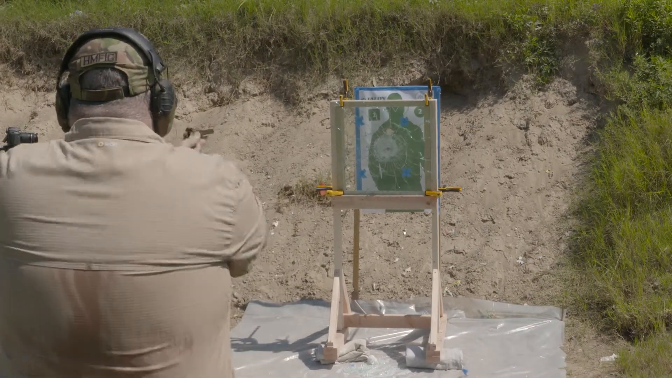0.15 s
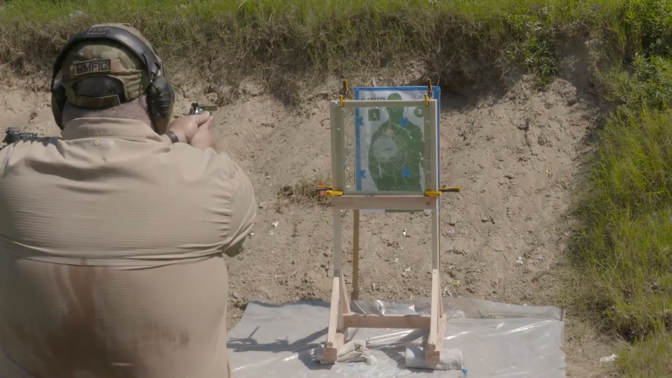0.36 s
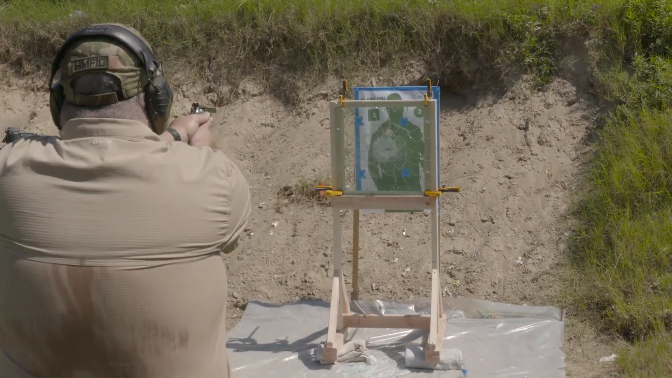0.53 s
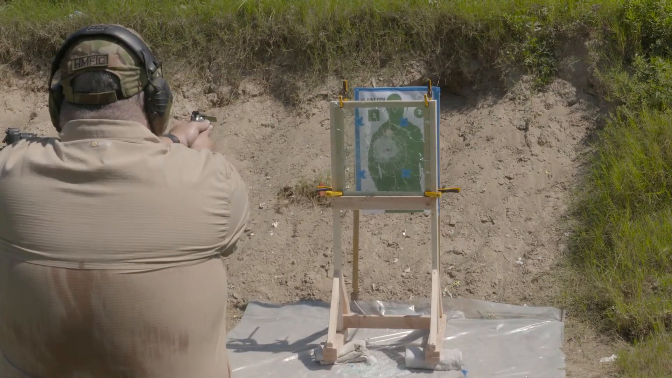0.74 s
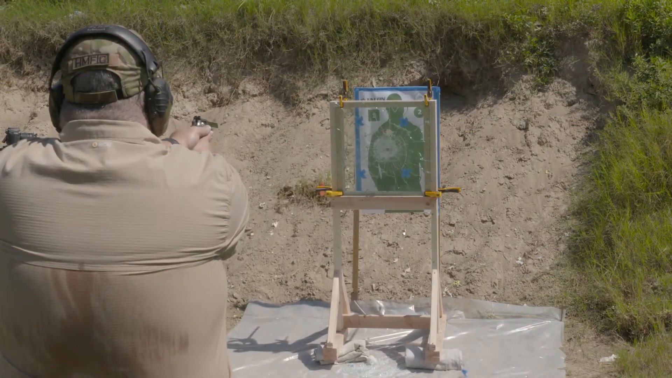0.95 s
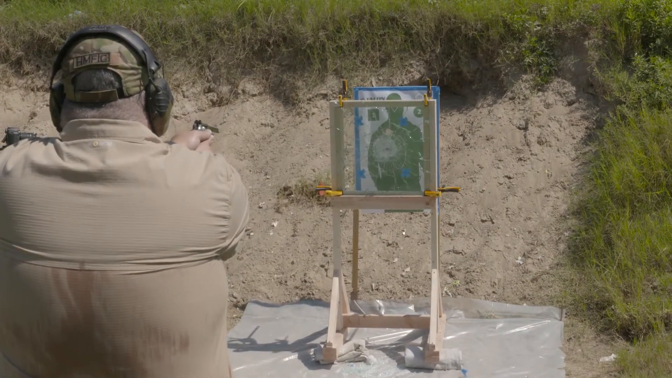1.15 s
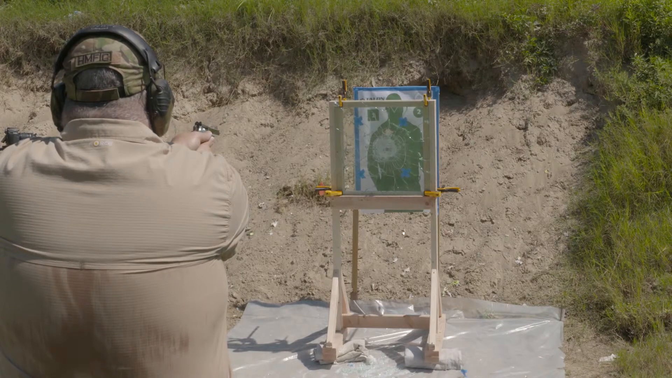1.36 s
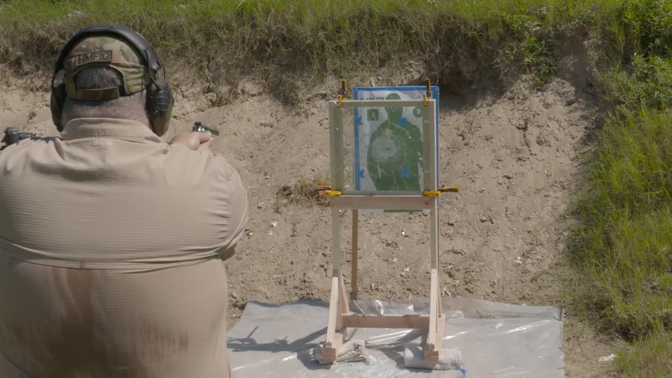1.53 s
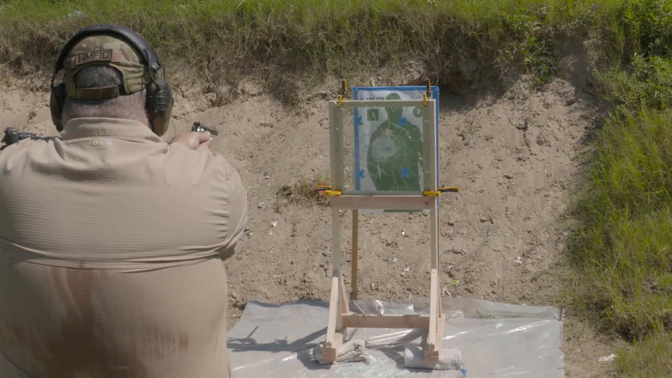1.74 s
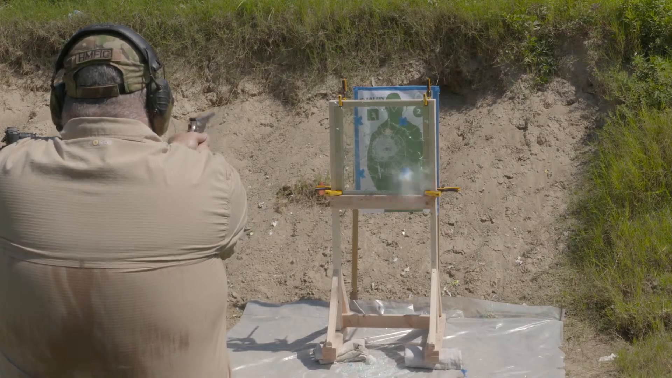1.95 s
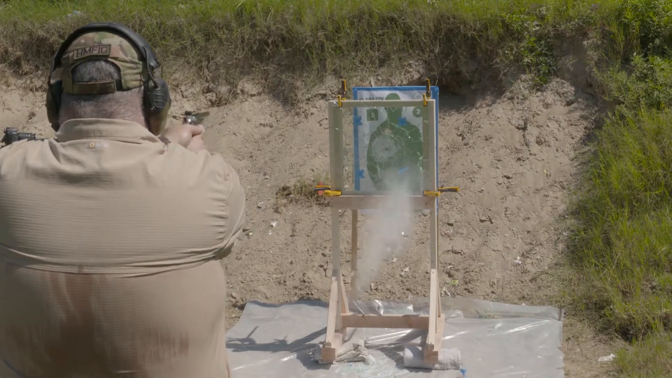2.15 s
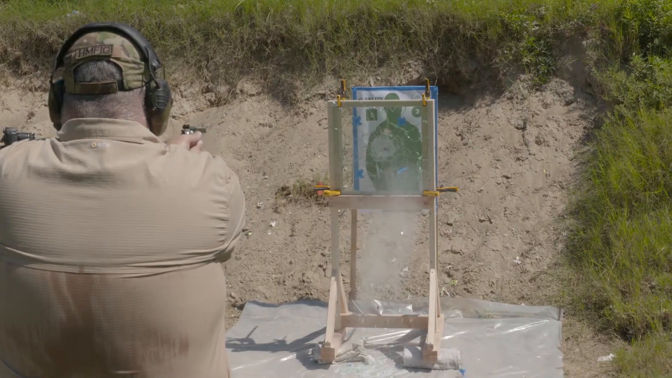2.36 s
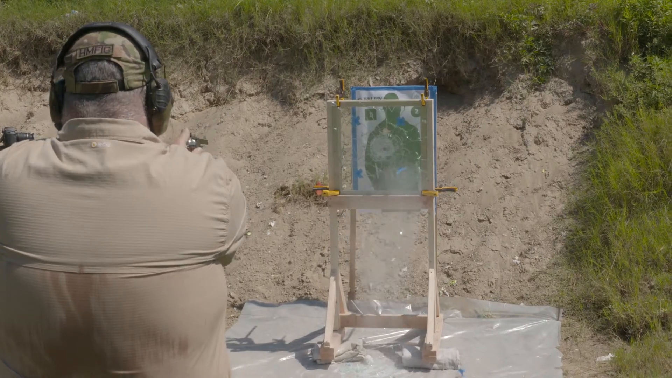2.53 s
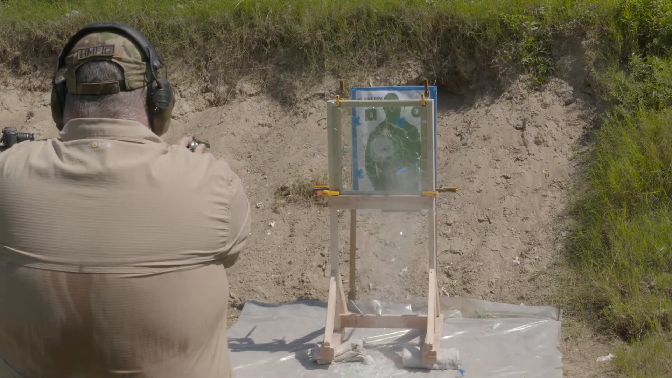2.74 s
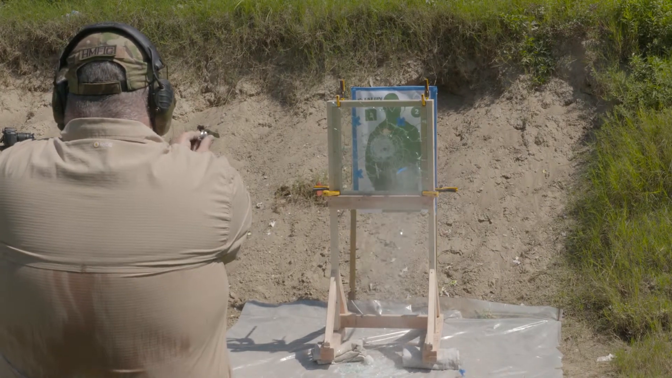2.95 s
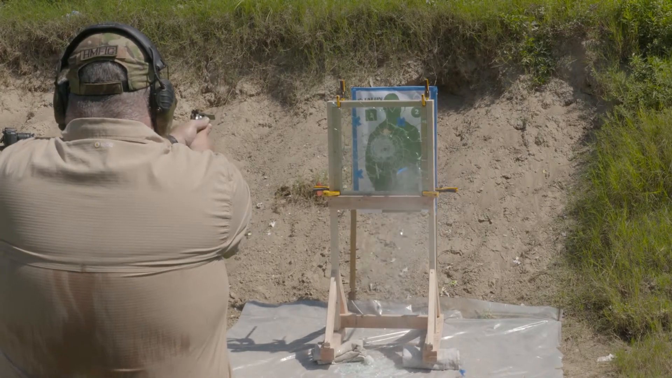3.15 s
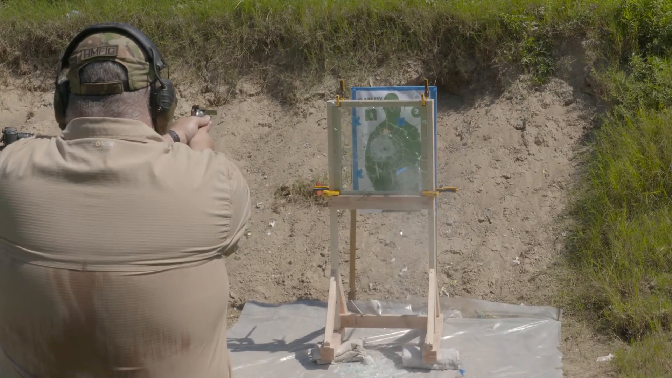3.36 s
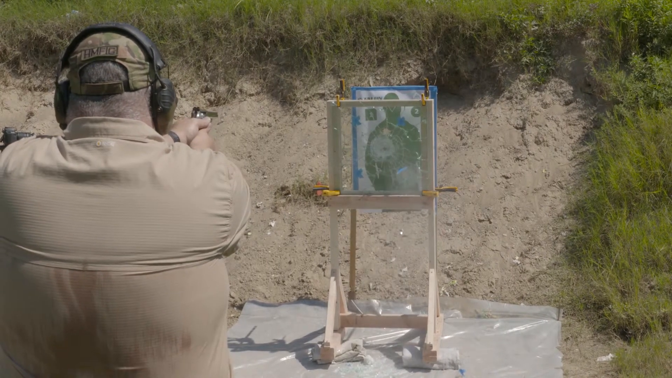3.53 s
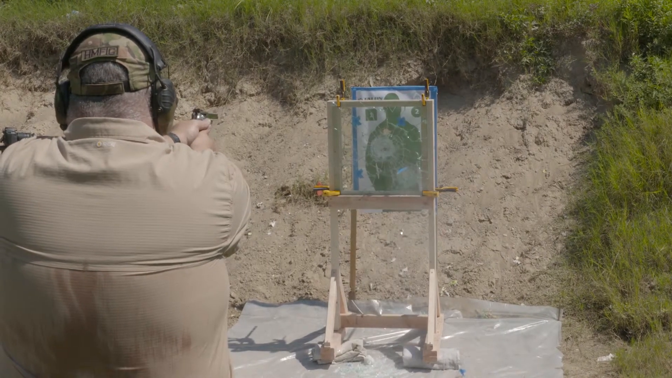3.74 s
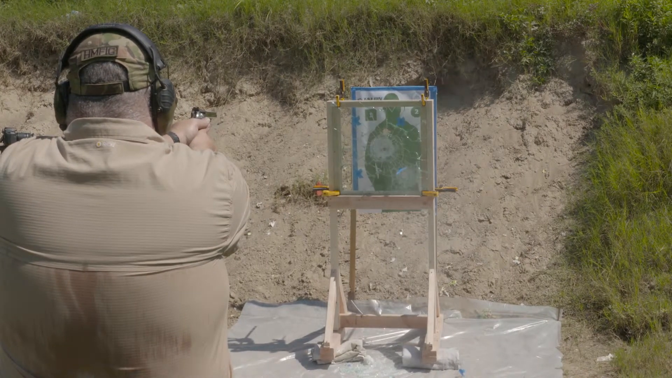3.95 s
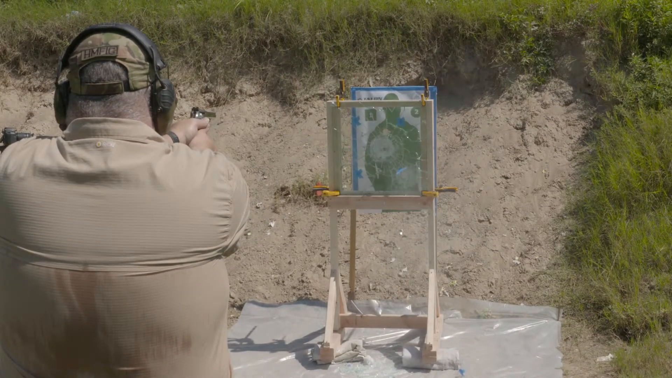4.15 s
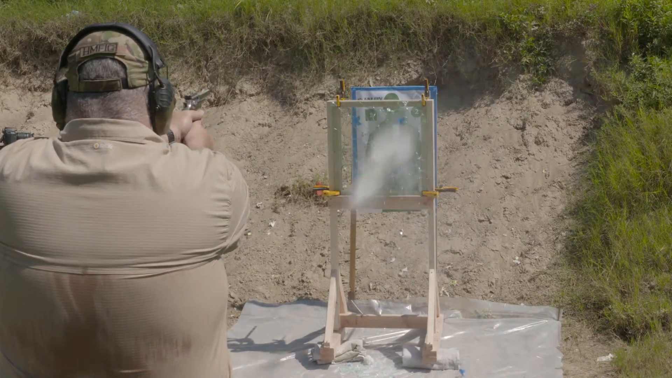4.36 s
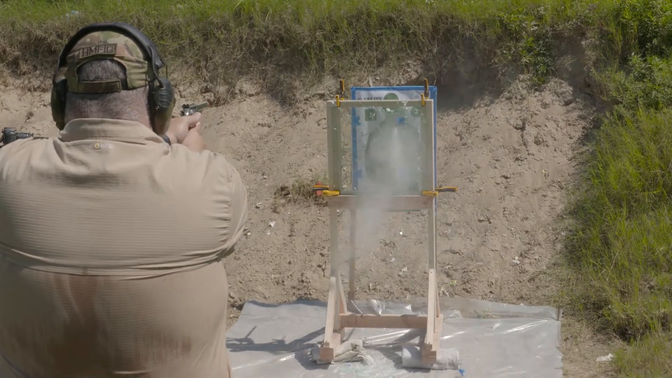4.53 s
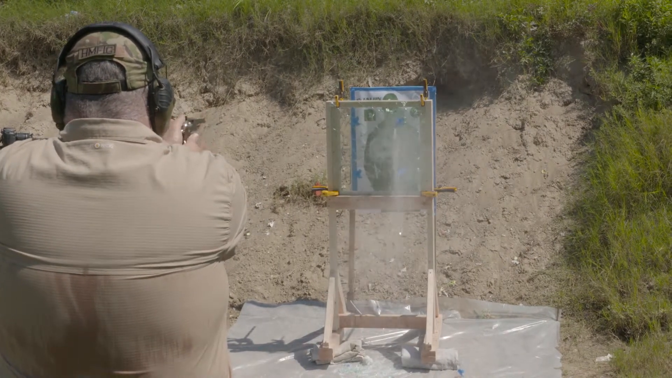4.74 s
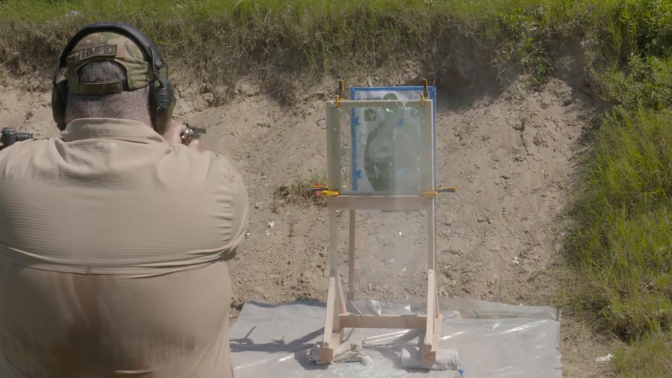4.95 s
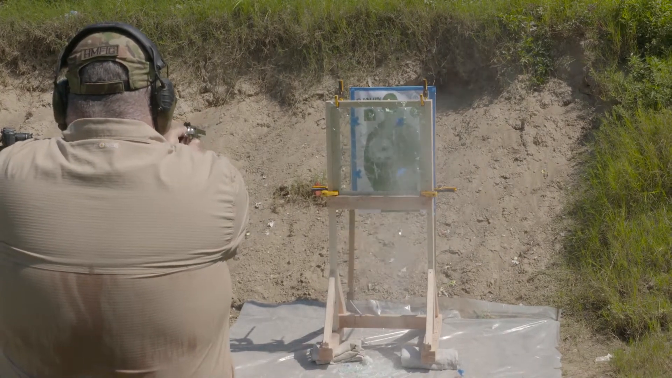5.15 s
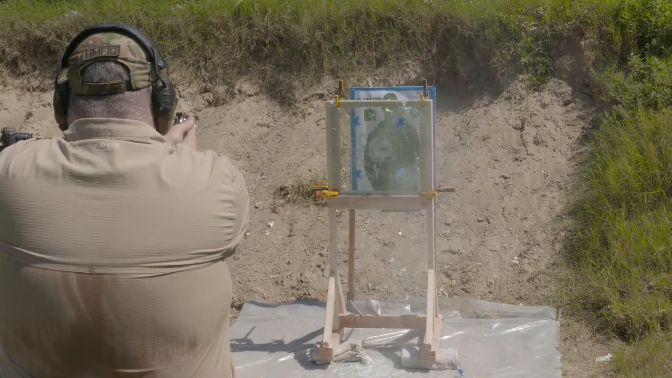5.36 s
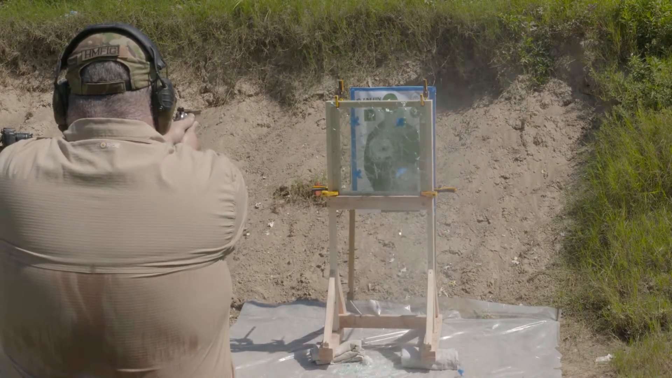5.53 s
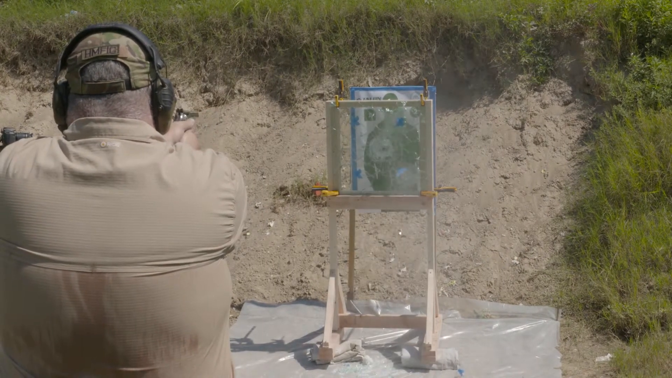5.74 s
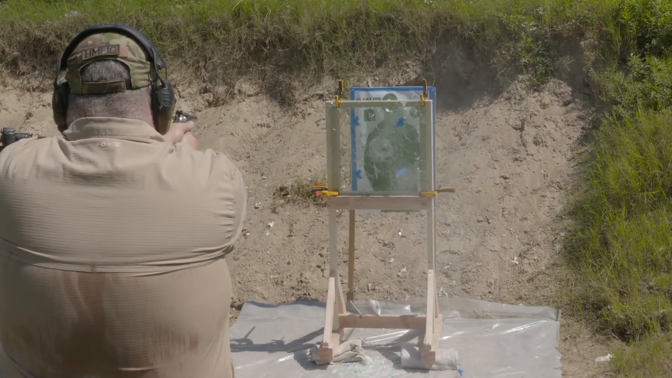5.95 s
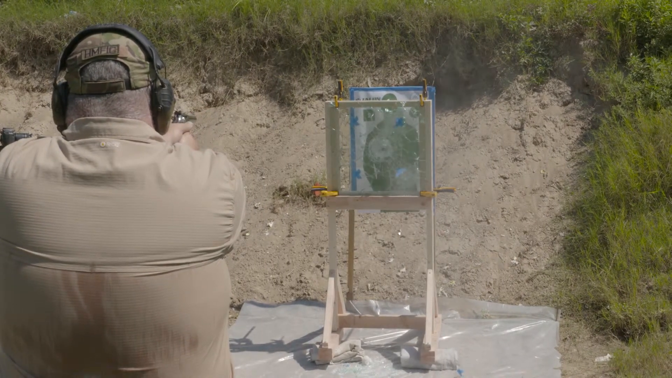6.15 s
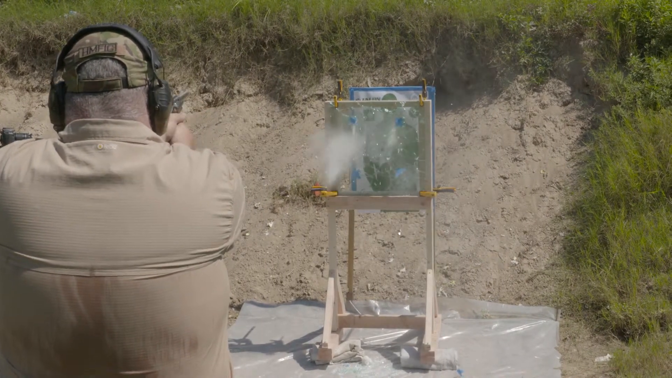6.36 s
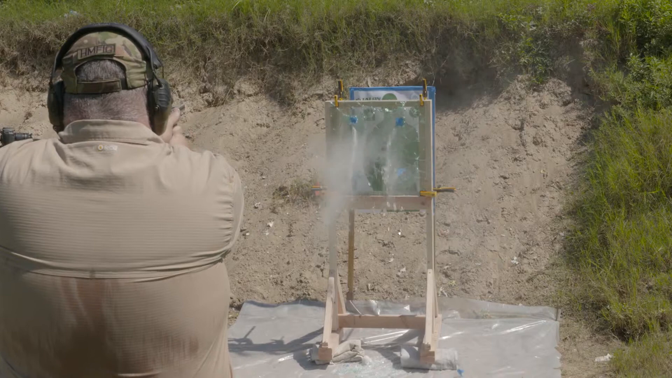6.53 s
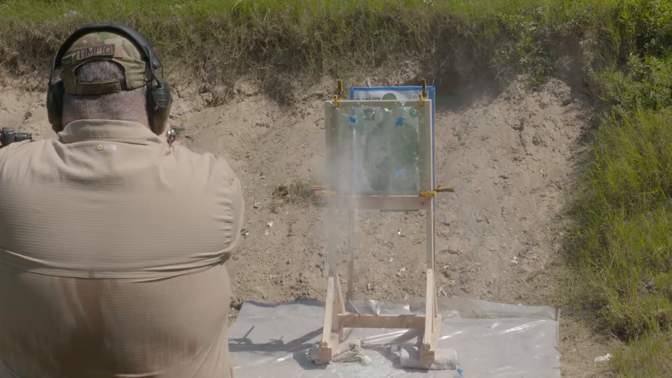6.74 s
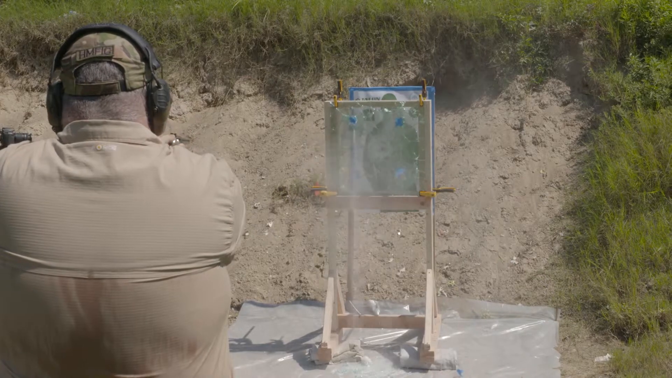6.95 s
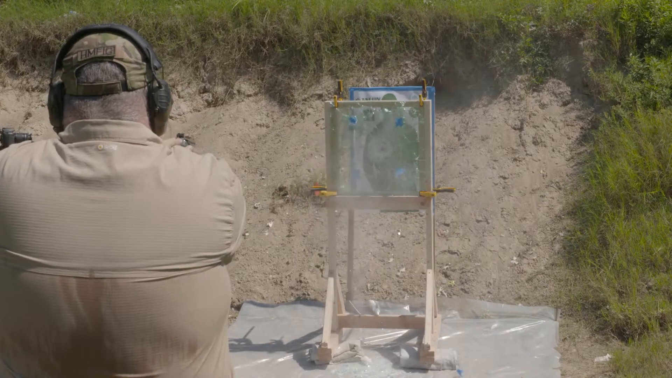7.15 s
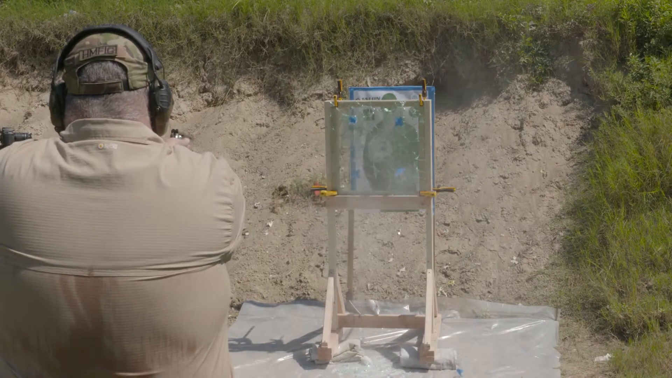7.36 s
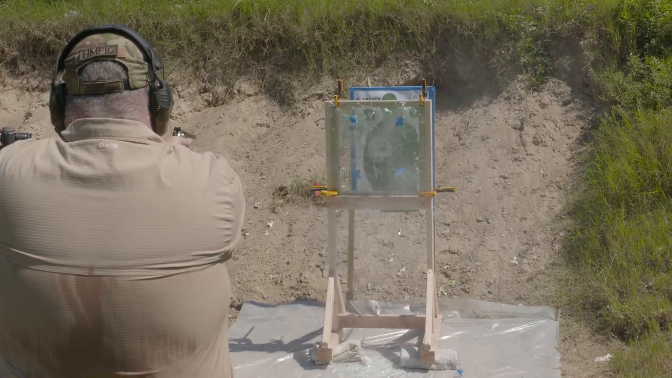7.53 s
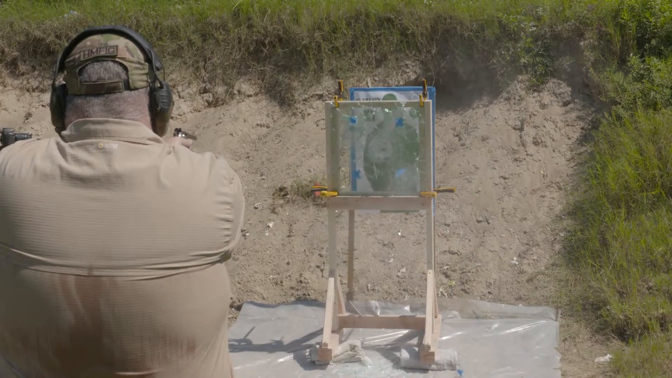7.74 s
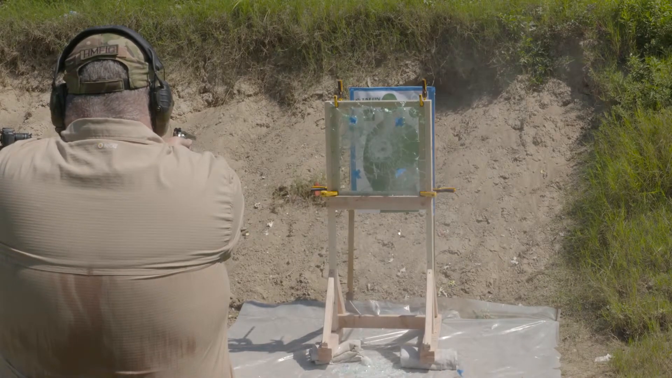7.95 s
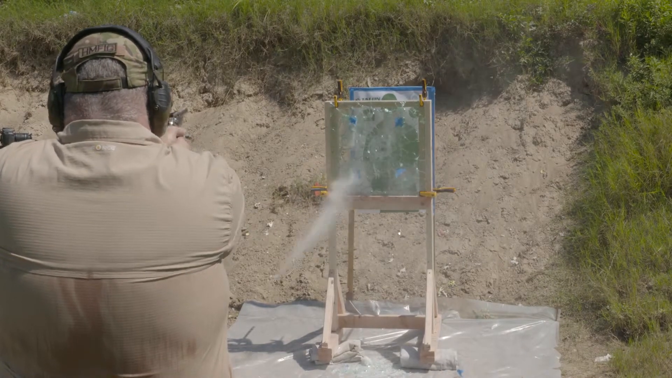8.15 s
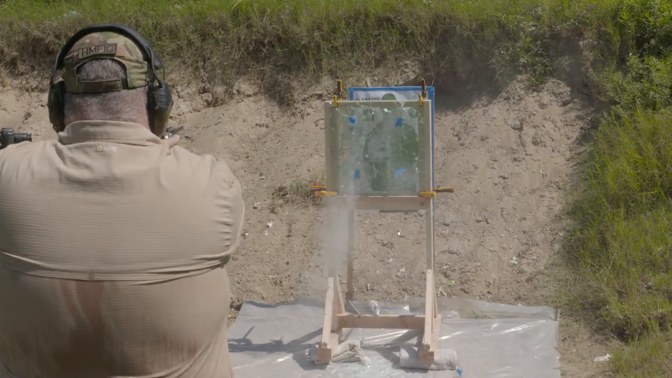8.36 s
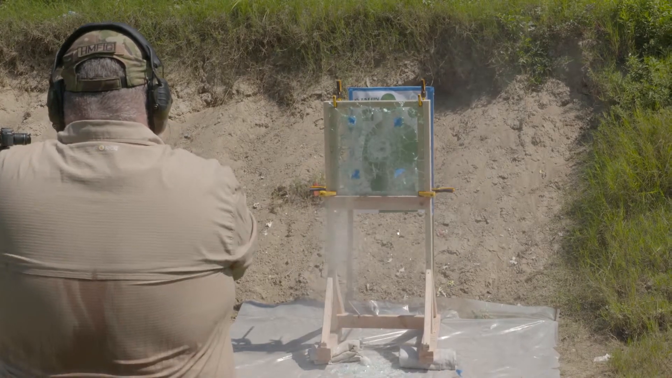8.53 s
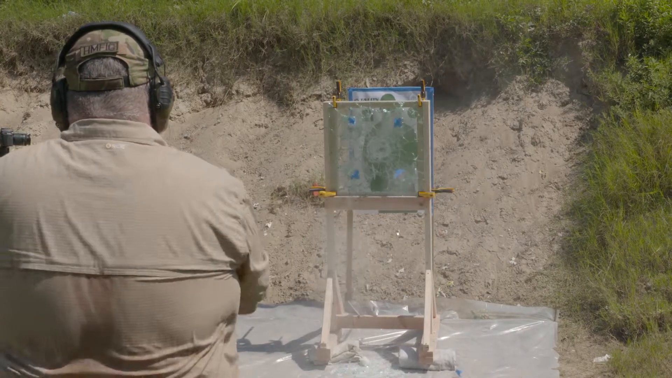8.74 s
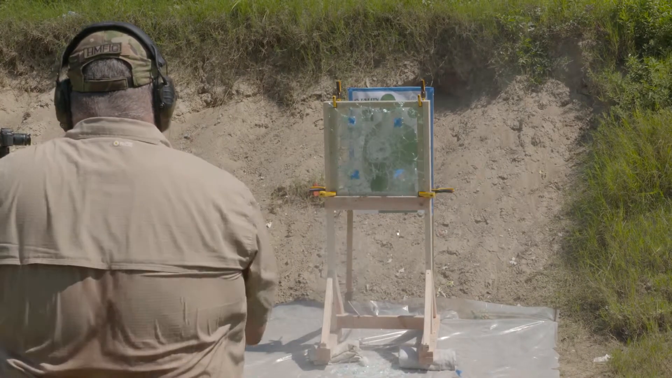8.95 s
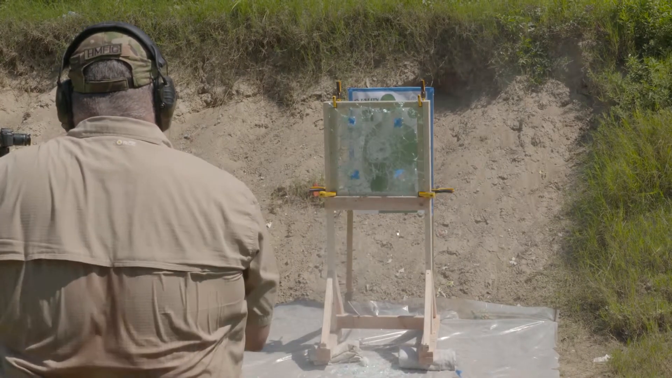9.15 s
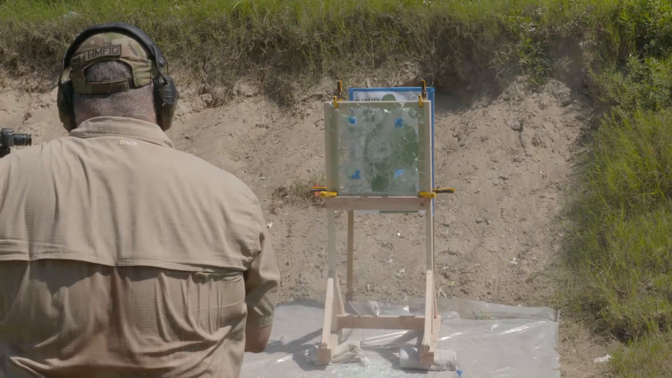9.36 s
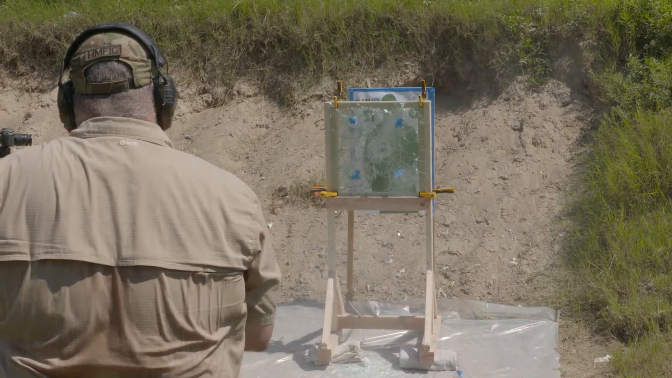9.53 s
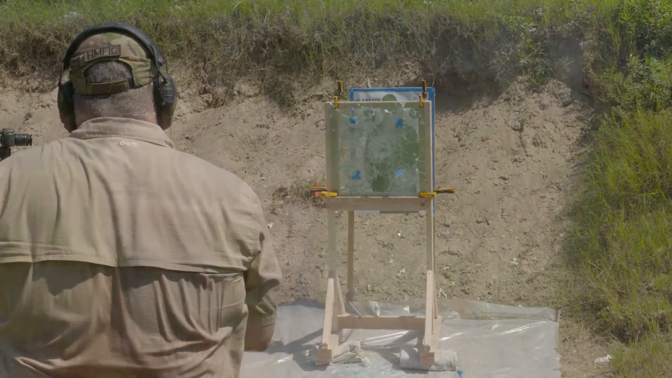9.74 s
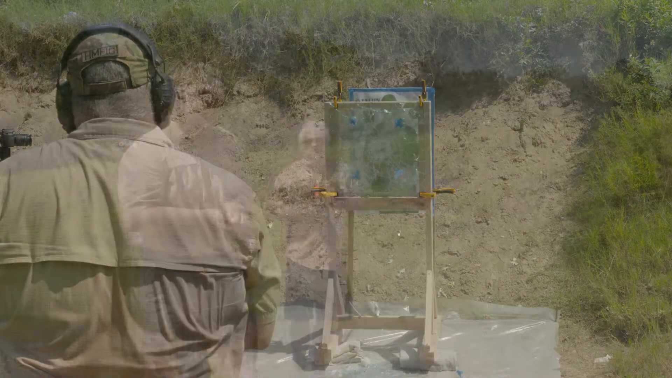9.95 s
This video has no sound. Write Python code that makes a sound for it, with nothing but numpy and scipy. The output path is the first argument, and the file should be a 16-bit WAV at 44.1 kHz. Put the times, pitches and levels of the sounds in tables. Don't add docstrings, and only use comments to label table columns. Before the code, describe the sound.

In a quiet meadow with low wind rumble, chirping cricket, insect hiss and faint far traffic, a handgun right by the microphone fires four separate shots about two seconds apart. Each distorts hard, bounces off an earth bank, flutters downward in pitch and rolls away, while glass shards tick and patter down. The background is ducked after the first shot. Mono.

```python
import sys
import numpy as np
from scipy import signal
from scipy.fft import rfft, irfft, next_fast_len
from scipy.io import wavfile
from scipy.ndimage import uniform_filter1d, map_coordinates

SR = 44100
rng = np.random.default_rng(int(sys.argv[2]) if len(sys.argv) > 2 else 0)


def put_to_file(sound):
    columns = np.atleast_2d(sound).T
    safe = np.clip(columns, -1, 1)
    whole_steps = np.round(safe * 32767)
    wavfile.write(sys.argv[1], SR, whole_steps.astype(np.int16))


def gain_from_decibels(decibels):
    exponent = np.asarray(decibels, float) / 20
    return 10 ** exponent


N = 441000
TIME = np.arange(N) / SR
SHOT_TIME = np.arange(SR // 2) / SR


def noise(t):
    return rng.standard_normal(len(t))


def unit(x):
    return x / np.sqrt(np.mean(x ** 2) + 1e-20)


def at_peak(x, db):
    return gain_from_decibels(db) * x / np.abs(x).max()


def mix_db(*levels_db):
    return 10 * np.log10(sum(gain_from_decibels(db) ** 2 for db in levels_db))


def curves(rows, t=TIME):
    s, *cols = np.transpose(rows)
    return [np.interp(t, s, c) for c in cols]


def wobble(rate):
    return map_coordinates(rng.standard_normal(int(N * rate / SR) + 4), [TIME * rate])


def tone(hz):
    return np.sin(2 * np.pi * np.cumsum(hz) / SR)


def colour(x, spectrum):
    m = next_fast_len(len(x) + 8192)
    f, db = np.transpose(spectrum)
    bins = np.log(np.fft.rfftfreq(m, 1 / SR) + 1)
    gain = gain_from_decibels(np.interp(bins, np.log(f + 1), db, left=-120, right=-120))
    return unit(irfft(rfft(x, m) * gain, m)[:len(x)])


def rush(spectrum, patchy_db):
    z = signal.stft(noise(TIME), nperseg=512)[2]
    field = uniform_filter1d(rng.standard_normal(z.shape), size=6, axis=0)
    field = uniform_filter1d(field, size=10, axis=1)
    patchy = signal.istft(z * gain_from_decibels(patchy_db * unit(field)), nperseg=512)[1][:N]
    return colour(patchy, spectrum)


def grains(rate, centre_hz, cycles):
    draw, k = rng.random((int(rate * N / SR), 2)), np.arange(64)
    hz = centre_hz * np.exp(0.55 * rng.standard_normal(len(draw)))
    hz = np.clip(hz, 800, 15000)[:, None]
    wave = np.sin(2 * np.pi * hz * k / SR) * np.exp(-k * hz / SR / cycles) * gain_from_decibels(-18 * draw[:, 1:])
    at = (draw[:, :1] * (N - 64)).astype(int) + k
    return unit(np.bincount(at.ravel(), wave.ravel(), N))


def add(track, s, x):
    part = track[round(s * SR):][:len(x)]
    part += x[:len(part)]


# time in seconds, level in dB.
WIND = [(0, -42.5), (.4, -45.5), (.7, -46), (1.1, -48.5), (1.6, -43), (2.2, -44.5), (2.7, -45.5),
        (3.15, -45), (3.27, -37), (3.42, -43), (3.54, -37), (3.7, -42), (4, -42.5), (5, -46), (5.7, -42),
        (6.7, -42.5), (7.15, -41), (7.6, -43), (8.5, -42), (9.3, -38), (9.75, -41), (10, -31)]
# frequency in Hz, level in dB per Hz.
RUMBLE = [(8.8, -29.5), (15, 5), (49, 6), (103, -7), (140, -13), (200, -15), (260, -39), (440, -120)]


def wind(gain_db):
    level_db = gain_db + curves(WIND)[0] + 1.5 * wobble(11.0)
    return gain_from_decibels(level_db) * rush(RUMBLE, patchy_db=1.5)


# frequency in Hz, level in dB per Hz.
ROAD = [(41, -23), (70, 1), (135, -6.5), (199, -1.5), (358, -4.5), (489, -4.5), (877, -10.5), (2000, -35),
        (2500, -34), (3250, -57), (5500, -120)]


def road(gain_db):
    roll_db = [np.where(TIME > s, -58 - 10 * (TIME - s), -120) for s, *_ in SHOTS]
    car_db = 4 * np.clip((TIME - 9.78) / 0.063, 0, 1)
    level_db = mix_db(gain_db - 47 + car_db, *roll_db) + 4.5 + 0.8 * wobble(6.0)
    return gain_from_decibels(level_db) * rush(ROAD, patchy_db=0.3)


# note in Hz, steady level in dB, then its swells as it passes, each
# the closest moment in seconds, rise in dB, width in seconds.
DRONE = [
    (90, -66, [(4, 5.5, 0.37), (5.9, 13, 0.53), (7, 8.5, 0.41), (9.3, 7.5, 0.56)]),
    (150.6, -69.5, [(3.1, 1.5, 0.36), (5.45, 14.5, 0.86)]),
    (254, -73.5, [(5.75, 11.5, 0.78)]),
    (173, -80, [(7.7, 14, 0.41)]),
]


def engine():
    out = np.zeros(N)
    for hz, steady_db, swells in DRONE:
        pass_db = sum(rise_db * np.exp(-((TIME - s) / width) ** 2) for s, rise_db, width in swells)
        level_db = steady_db + pass_db + 3 + 1.5 * wobble(4.2)
        out += gain_from_decibels(level_db) * tone(hz * (1 + 0.0065 * wobble(4.5)))
    return out


# frequency in Hz, level in dB per Hz.
FIELD = [(710, -27), (1200, -1), (2010, -10), (3080, -7.5), (3500, -10), (4180, -5), (4550, -6),
         (6530, -3.5), (8560, -21), (9000, -19.5), (11700, -48), (19800, -120)]
# frequency in Hz, level in dB per Hz.
AIR = [(7000, -11.5), (9000, 1), (12000, -4.5), (16000, -5.5)]


def meadow():
    return gain_from_decibels(-52) * rush(FIELD, patchy_db=1.0) + gain_from_decibels(-72) * rush(AIR, patchy_db=.3)


CHIRPS = [.098, .515, .873, 1.185, 1.525, 1.865, 2.8, 3.164, 3.514, 3.845, 5.42, 5.783, 6.11, 7.261, 7.722,
          9.24, 9.5, 9.655]
# frequency in Hz, level in dB per Hz.
KATYDID = [(8900, -30.5), (9400, -5.5), (10000, -3.5), (10400, -8), (10700, -32.5)]
# frequency in Hz, level in dB per Hz.
BUZZER = [(9700, -26.5), (10200, -8.5), (10600, 0.5), (10850, -31)]
# frequency in Hz, level in dB per Hz.
SHRILL = [(9300, -22), (9850, 1), (10150, 0), (10600, -23)]


def insects():
    out, t = np.zeros(N), np.arange(round(.024 * SR)) / SR
    note = np.hanning(len(t)) * np.sin(2 * np.pi * (4360 * t - 4500 * t ** 2))
    for s in CHIRPS:
        for k, db in enumerate(rng.normal(0, 1.6, size=3)):
            add(out, s + .05 * k, gain_from_decibels(db - 51.5 - 3 * (s > 1.82)) * note)
    later = TIME > 1.82
    buzz = 1 + .55 * np.sin(2 * np.pi * 70 * TIME)
    katydid_db = 3.5 * np.cos(2 * np.pi * 4.9 * (TIME - .3) + .4 * wobble(1.5)) - 66.5 - 4 * later
    out += gain_from_decibels(-67.5 + 2.7 * later) * rush(SHRILL, patchy_db=2.5)
    out += gain_from_decibels(katydid_db) * rush(KATYDID, patchy_db=0.47)
    return out + gain_from_decibels(-67.5 - 7.4 * later) * buzz * rush(BUZZER, patchy_db=2.5)


# time in seconds, gain in dB.
GAIN = [
    (0, 1),
    (1.818, 1),
    (1.826, -13.5),
    (9.78, -16.5),
    (10, -7.5),
]


def background():
    gain_db = curves(GAIN)[0]
    return wind(gain_db) + road(gain_db) + gain_from_decibels(gain_db) * (meadow() + insects()) + engine()


# start in seconds, peak in dB, centre in Hz, treble over the peak in dB.
SHARDS = [(0.0278, -34, 6297, -19), (2.348, -41, 2800, -23), (2.394, -38, 3840, -26),
          (2.4798, -29.5, 2363, -8), (2.895, -32, 3480, -14), (3.0344, -50, 4220, -19.5),
          (3.349, -45, 3820, -20.5), (3.7995, -42, 4050, -17), (3.9, -46, 4200, -24),
          (4.692, -33, 1843, -25), (4.7402, -30.5, 4254, -28), (4.8054, -40, 1900, 1.5),
          (4.9154, -34, 2590, 1), (6.4314, -41, 2890, -19), (6.8014, -42, 1840, -11),
          (6.8235, -27, 3100, -22), (6.847, -27.5, 4950, 0), (7.0834, -36, 2230, -19),
          (7.393, -42.5, 2500, -10), (7.8297, -50, 4240, -14.5), (8.2217, -34, 3660, -29),
          (8.4157, -38, 2650, -12), (8.4632, -36, 5900, -22), (8.595, -37, 2100, 3), (8.698, -33, 4050, -9),
          (8.7154, -38, 2670, 1), (8.9436, -43, 3600, -18.5), (9.0144, -41.5, 4070, -16),
          (9.0874, -44, 4010, -19), (9.1544, -50, 4290, -25)]
# start in seconds, peak in dB,
# centre in Hz.
SHOWER = [(4.6743, -40, 1840), (4.8397, -33, 2120), (4.9844, -35, 5100), (5.032, -33, 5310),
          (5.0564, -38, 3170), (5.086, -30, 3650), (5.1294, -36, 4690), (5.1434, -42, 2020),
          (5.1784, -39, 3760), (5.2739, -42, 3040), (5.3023, -41, 3700), (5.3268, -40, 3420),
          (5.3872, -36, 5600), (5.4161, -39, 2410), (5.43, -40, 2830), (5.473, -43, 3020),
          (5.4864, -45, 3850), (5.5214, -43, 3580), (5.5264, -44, 4500), (5.5484, -46, 3370),
          (5.5707, -44, 3680), (5.5957, -38, 2600), (5.6094, -49, 4150), (5.6241, -46, 5850),
          (5.6364, -47, 4750), (5.6531, -45, 4620), (5.6884, -47, 3910), (5.7354, -49, 5730),
          (5.8094, -51, 3110), (5.8194, -52.5, 3200), (5.8604, -48, 3250), (5.887, -49, 2430),
          (5.9024, -49, 2850), (5.9614, -53, 3220),
          (2.3251, -46, 4000), (2.4124, -35, 2720), (2.435, -34, 3920), (2.7621, -47, 3160),
          (2.8544, -43, 2960), (2.9444, -44, 3140), (6.7984, -44, 3200), (6.8084, -32, 5700),
          (6.8334, -32, 4770), (6.8524, -29, 4150), (6.908, -32, 4900), (6.939, -32, 5180),
          (7.2214, -49, 6650), (8.5679, -36, 3900), (8.6244, -36, 2700), (8.741, -38, 3960),
          (8.8744, -55, 2980), (8.9164, -49, 5440), (9.5844, -54, 5560)]
# start in seconds, peak in dB, centre in Hz.
SPITS = [(2.363, -48, 10000), (2.4079, -56, 9550), (2.6968, -46, 14900), (2.8943, -52, 9300),
         (3.0954, -57, 9920), (4.7594, -49, 9550), (4.805, -33, 13200), (4.8623, -45, 9410),
         (4.9152, -35, 9560), (4.9332, -44, 13200), (4.9424, -46, 9730), (5.0888, -47, 13700),
         (5.1223, -52, 9830), (5.245, -52, 14500), (5.3278, -47, 9670), (5.3774, -58, 10300),
         (5.3867, -44, 13700), (5.4156, -50, 9390), (5.5263, -52, 9750), (5.6231, -53, 9960),
         (6.756, -54, 9340), (6.773, -49, 9910), (6.7984, -40, 9380), (6.8064, -35, 13800),
         (6.8234, -36, 9320), (6.8314, -37, 10400), (6.9044, -42, 10200), (6.9244, -43, 10500),
         (6.9994, -42, 9240), (7.0164, -42, 9840), (7.4026, -50, 10100), (8.4312, -52, 9190),
         (8.5135, -51, 9790), (8.532, -54, 9850), (8.5669, -48, 9380), (8.6208, -48, 9300),
         (8.7064, -43, 13800), (8.7664, -39, 9040), (8.8253, -52, 13800), (8.8764, -51, 9960),
         (8.9491, -50, 13900)]
# start in seconds, peak in dB, pitch in Hz, 60 dB decay in seconds.
RINGS = [(5.388, -39, 5600, 0.019), (2.568, -34, 15200, .03), (2.958, -57, 14100, .03),
         (5.034, -54, 13700, .04), (2.8945, -34, 3600, 0.017), (2.9005, -34, 3470, 0.014),
         (5.392, -53, 13800, .03), (7.147, -44, 15300, .02), (7.27, -56, 11200, 0.046),
         (7.27, -58.5, 9300, 0.055), (8.74, -52, 9300, 0.086), (8.756, -44, 13500, .025),
         (9.026, -56, 9400, 0.086)]
# start in seconds, peak in dB, centre in Hz.
KNOCKS = [
    (5.43, -39.5, 1900),
    (5.595, -44, 1510),
    (7.0572, -28.5, 880),
    (7.062, -40, 1200),
    (7.07, -34, 1500),
    (7.077, -37, 993),
    (9.319, -50, 670),
]


def shards():
    out, t = np.zeros(N), np.arange(SR // 12) / SR
    crumb_treble_db = -23
    for s, db, hz, treble_db in SHARDS + [(*row, crumb_treble_db) for row in SHOWER]:
        body = colour(noise(t), [(0.3 * hz, -22), (hz, 0), (1.6 * hz, -10), (4 * hz, -26)])
        spit = colour(noise(t), [(6000, -16), (9000, 3.0), (16000, -4.0)])
        add(out, s, at_peak(gain_from_decibels(-60 * t / 0.017) * (body + gain_from_decibels(treble_db) * spit), db - 1.0))
    for s, db, hz in SPITS:
        spit = colour(noise(t), [(0.25 * hz, -18), (0.55 * hz, -4), (hz, 0), (16500, -4)])
        add(out, s, at_peak(gain_from_decibels(-60 * t / 0.013) * spit, db + .1))
    for s, db, hz, t60 in RINGS:
        add(out, s, gain_from_decibels(db - 60 * t / t60) * np.sin(2 * np.pi * hz * t) * (1 - np.exp(-t / .001)))
    for s, db, hz in KNOCKS:
        thud = colour(noise(t), [(0.23 * hz, -20), (hz, 0), (2.5 * hz, -4), (5 * hz, -25)])
        add(out, s, at_peak(gain_from_decibels(-60 * t / .026) * (1 - np.exp(-t / .0004)) * thud, db))
    return out


def bullet_crack(t):
    spectrum = [(500, -18.0), (1200, 2.5), (2500, -6.5), (5000, -7.5), (15000, -22.0)]
    burst = np.where(t < .0022, gain_from_decibels(11), gain_from_decibels(-19 - 60 * t / .12))
    return (colour(noise(t), spectrum) - .3) * burst * np.clip(t / 0.00011, 0, 1) ** 2


# delay in ms, level in dB, length in ms, polarity.
ARRIVALS = [(1.9, 1.5, 5.3, 1), (5.06, 13, 1.3, -1.4), (5.51, 15, 0.2, 0.92), (10.1, -3.5, 0.45, -0.64),
            (6.8, -5, 1.6, 0.8), (13.93, 5, 0.033, 0.85), (14.59, 7.5, 0.06, 1), (15.14, 3.5, 0.19, -1.7),
            (19.14, -2.5, 0.64, 1), (22.9, 10, .25, 1), (23.9, 5, .7, 1)]


def muzzle_blast(t):
    out = np.zeros(len(t))
    chance = rng.standard_normal((len(ARRIVALS), 2))
    for (delay, level_db, length, sign), (late, size) in zip(ARRIVALS, chance):
        u = np.clip((t * 1000 - delay - 0.0049 * delay * late) / length, 0, None)
        onset = 1 - np.exp(-u * length / (0.018 + 0.00066 * delay))
        out += sign * gain_from_decibels(level_db + 0.91 * size) * (1 - u) * np.exp(-u) * onset
    return out


# delay in seconds, width in seconds, boom gain in dB, crackle gain in dB.
FLARES = [
    (0.0148, .0015, 0, 7),
    (.024, .0015, 2.5, 3.5),
    (.029, .005, 8, 1.5),
    (.039, .003, -3, -1.5),
    (.051, .006, 1.5, -2),
    (0.064, .005, 4.5, 2.5),
]
CLAMP_S = .073


def bay(t):
    after = np.clip(t - CLAMP_S, 0, None)
    clamp_db = -3.5 * np.clip(after / 0.00072, 0, 1) - 307 * after
    rise_db = -12 * np.clip(1 - t / 0.015, 0, 1)
    flare_db = sum(np.outer([boom, crackle], np.exp(-((t - s) / width) ** 2))
                   for s, width, boom, crackle in FLARES)
    held_db = np.array([-19 + 0 * t, -14.5 - 90 * np.minimum(t, CLAMP_S)])
    linger_db = [-51 - 129 * np.abs(t - .17)] - np.c_[[0, 3]]
    return mix_db(held_db + flare_db + rise_db + clamp_db, linger_db)


# frequency in Hz, level in dB per Hz.
BOOM = [(40, -29.5), (70, -11), (240, -10), (500, -1), (900, 0), (1300, -4.5), (2000, -12), (3000, -21),
        (4500, -52)]
# frequency in Hz, level in dB per Hz.
CRACKLE = [(710, -30), (1200, -5.5), (1460, -10.5), (1790, -8.5), (4080, -12.5), (7020, -13.5),
           (13900, -27), (16000, -33)]


def scatter(t, ground):
    boom_db, crackle_db = bay(t)
    jet = ground + 0.68 * rng.standard_normal((2, len(t)))
    clumps = colour(noise(t), [(1, -6), (60, 0), (250, 0), (500, -20)])
    boom = gain_from_decibels(boom_db) * colour(jet[0], BOOM)
    crackle = gain_from_decibels(crackle_db) * colour(jet[1], CRACKLE)
    return gain_from_decibels(2.5 * (t < CLAMP_S) * clumps) * (boom + crackle)


def rock(t, middle, dip, crest):
    v = (t - middle) / np.where(t < middle, dip, crest)
    return v * np.exp((1 - v ** 2) / 2)


# delay in ms, level in dB, dip to middle in ms.
BANK = [(11.4, -7, .45), (26.8, 0, .33), (28.7, 0, .28), (30.6, -3, .33), (32.4, -6, .3), (34.2, -3, .35),
        (35.9, -7, .4), (39, -12, .35), (44.35, 1, .42), (46.7, -5, .42), (50.4, -7, .3), (52.9, -4, .5),
        (54.8, -7, .35), (57.5, -9, .33), (58.9, -10, .3), (60.4, -5, .4), (62.2, -8, .33), (64, -3, .27),
        (66.5, -3, .36), (68.6, -8, .3), (71.3, -2, .5)]


def bank_echoes(t):
    out = np.zeros(len(t))
    for (delay, level_db, length), (late, size) in zip(BANK, rng.standard_normal((len(BANK), 2))):
        out += gain_from_decibels(-2.5 + level_db + 1.5 * size) * rock(t * 1000, delay + .25 * late, length, length)
    return out


# delay in seconds, pitch in Hz, level in dB.
FLUTTER = [
    (0.084, 1011, -37),
    (.11, 900, -31),
    (.135, 721.5, -34.5),
    (.15, 625, -41.5),
    (.165, 580, -29.5),
    (.18, 560, -42.5),
    (.22, 537, -48),
]


def post_flutter(t, uneven):
    hz, level_db = curves([(.07, 1113, -90)] + FLUTTER + [(.33, 507, -86)], t)
    phase = 2 * np.pi * np.cumsum(hz) / SR + 0.62 * uneven[::-1]
    return gain_from_decibels(level_db) * (1 + 0.42 * uneven) * np.sin(phase)


# delay in seconds, level in dB.
NEAR = [(.16, -45), (.19, -2.5), (.22, -1), (.27, -2), (.31, -4), (.325, -12), (.37, -16), (.4, -10),
        (.46, -10)]
# frequency in Hz, level in dB per Hz.
HILL = [(200, -8), (400, -1), (1400, -6), (3000, -7), (6000, -11.5), (9000, -17), (12000, -30),
        (16000, -31)]


def slope_answer(t, echo_db, uneven):
    near_db = curves([(.1, -93)] + NEAR + [(0.34, -30)], t)[0]
    wash = noise(t)
    combed = wash + .35 * np.roll(wash, round(SR / 1400))
    return gain_from_decibels(echo_db + near_db + 2 * uneven) * colour(combed, HILL)


def input_swing(t, swing_db, half, t60):
    sway = (1 - np.exp(-(t / 0.022) ** 2)) * np.sin(np.pi * (t / half) ** .74)
    return gain_from_decibels(swing_db - 60 * t / t60) * sway


# start in seconds, slope echo in dB, swing of the
# overloaded input in dB, its first half-cycle in seconds, its 60 dB decay in seconds.
SHOTS = [
    (1.968, -46, -7, 0.032, .14),
    (4.2363, -45, -6.5, 0.022, .1),
    (6.233, -43.5, -6.5, 0.016, .1),
    (8.003, -41.5, 3.5, 0.034, .21),
]
# level in dB, shot by shot.
LURCH_DB = [-19, -13.5, -11, -40]


def shots():
    out, t = np.zeros(N), SHOT_TIME
    ground = rng.standard_normal((2, len(t)))
    for (s, echo_db, swing_db, half, t60), lurch_db in zip(SHOTS, LURCH_DB):
        uneven = colour(noise(t), [(1, 0.0), (90, -1.5), (250, -18)])
        x = bullet_crack(t) + muzzle_blast(t) + scatter(t, ground) + bank_echoes(t)
        x += gain_from_decibels(lurch_db) * rock(t, .052, .017, .02)
        x += post_flutter(t, uneven) + slope_answer(t, echo_db, uneven)
        add(out, s, x - input_swing(t, swing_db, half, t60))
    return out


def swell(start, peak, level_db, fade_db_per_s):
    rising = level_db - 17 * np.clip((peak - TIME) / (peak - start), 0, 4)
    return np.maximum(rising - fade_db_per_s * np.clip(TIME - peak - 0.07, 0, None), -120)


# start after the shot in seconds, peak after it in seconds,
# tree line in dB, glass patter in dB, patter fade in dB per second.
ECHOES = [
    (.33, 0.46, -43.5, -47, 42.5),
    (0.31, 0.51, -44.5, -48.5, 24),
    (0.43, 0.51, -44.5, -47.5, 30),
    (0.36, 0.49, -45, -54, 26.5),
]
# frequency in Hz, level in dB per Hz.
TREES = [(120, -38.5), (220, 2), (400, 2.5), (700, 1), (1100, -8.5), (2000, -29.5)]
# frequency in Hz, level in dB per Hz.
SLOPE = [(600, -35.5), (1200, 1.5), (2500, -3), (4500, -7), (8000, -15.5), (11000, -40.5)]
# frequency in Hz, level in dB per Hz.
GLASS = [(2060, -28.5), (3500, 1), (4490, -4), (5060, 1), (11100, -10.5), (12000, -17), (13600, -13),
         (15100, -15.5), (16000, -20)]


def aftermath():
    rows = [(shot[0] + start, shot[0] + peak, *rest) for shot, (start, peak, *rest) in zip(SHOTS, ECHOES)]
    trees_db = mix_db(*[swell(start, peak, db, 32.5) for start, peak, db, _, _ in rows])
    glass_db = mix_db(*[swell(start, peak + 0.06, db, fade) for start, peak, _, db, fade in rows])
    middle_db = [swell(start, peak, db - 1.0, 57.5) for start, peak, db, _, _ in rows]
    slope_db = mix_db(glass_db - 2, *middle_db)
    slope = unit(rush(SLOPE, patchy_db=1.4) + 0.61 * grains(220, 2800, cycles=2.0))
    patter = unit(rush(GLASS, patchy_db=.4) + .4 * grains(600, 4500, cycles=1.2))
    out = gain_from_decibels(trees_db) * rush(TREES, patchy_db=-0.2)
    out += gain_from_decibels(slope_db + 1.1 * wobble(25)) * slope
    return out + gain_from_decibels(glass_db + 1.3 * wobble(25)) * patter


def scene():
    return (background() + shards() + shots() + aftermath())[None]


def roll_off(x):
    return signal.sosfilt(signal.butter(12, 16320, fs=SR, output="sos"), x)


def record(dry):
    coupled = signal.lfilter(*signal.butter(1, 6, "high", fs=SR), dry)
    clipped = coupled / (1 + np.abs(coupled / .98) ** 14) ** (1 / 14)
    limited = signal.sosfiltfilt(signal.ellip(8, .1, 40, 15900, output="sos", fs=SR), clipped)
    return roll_off(limited)


dry = scene()
out = record(dry)
put_to_file(out)
```